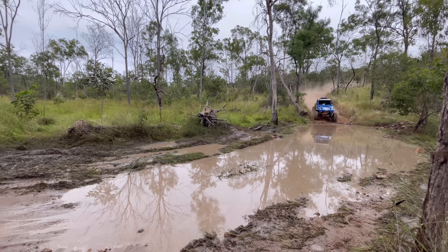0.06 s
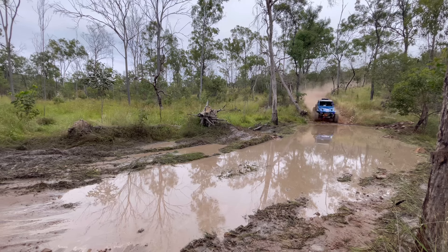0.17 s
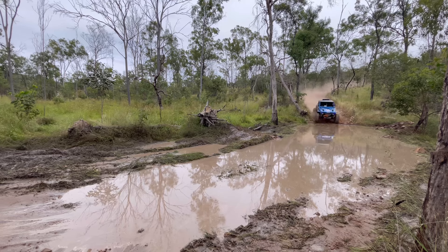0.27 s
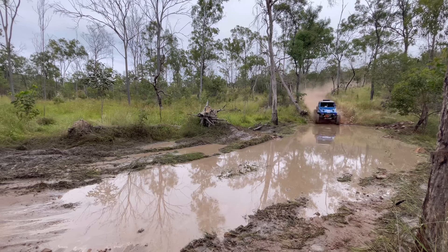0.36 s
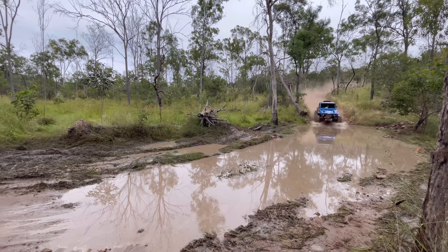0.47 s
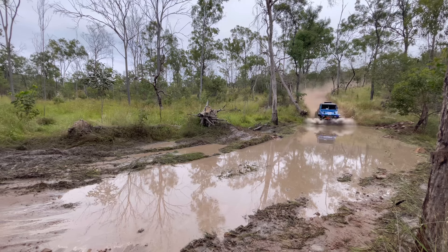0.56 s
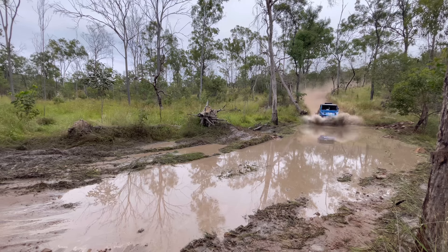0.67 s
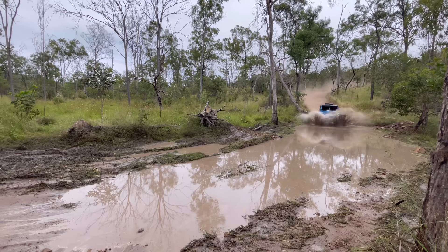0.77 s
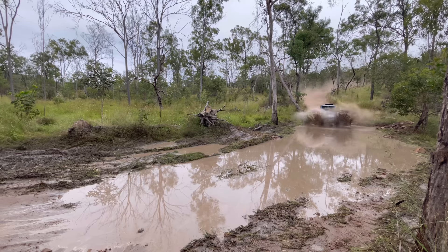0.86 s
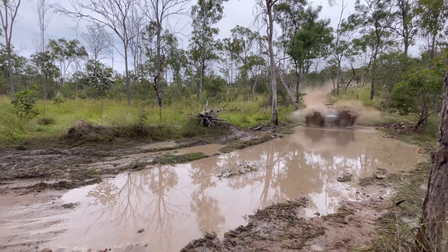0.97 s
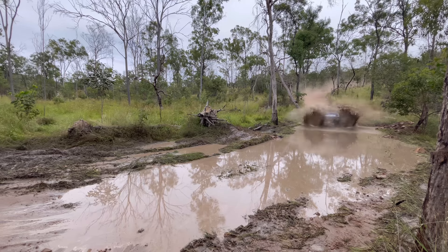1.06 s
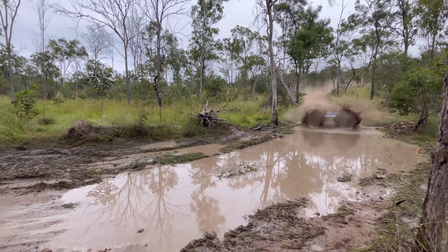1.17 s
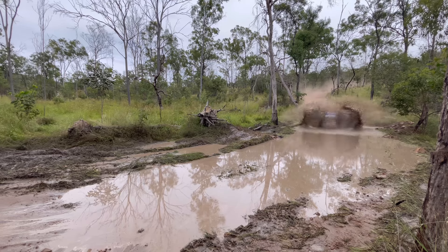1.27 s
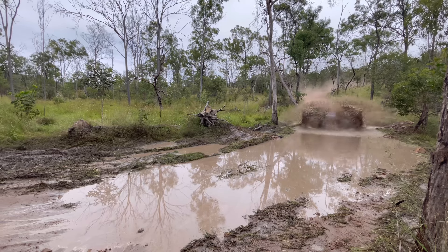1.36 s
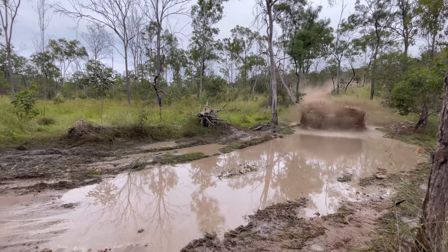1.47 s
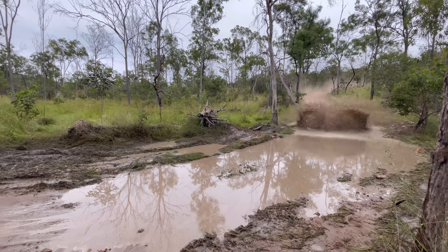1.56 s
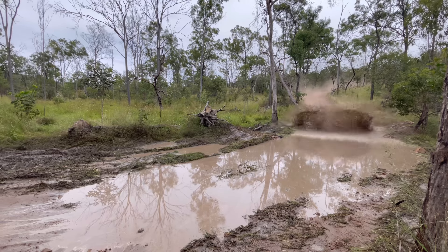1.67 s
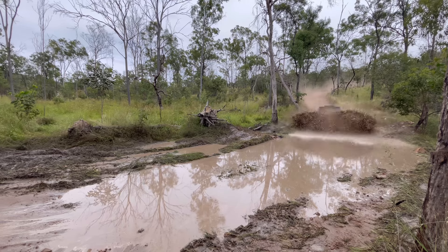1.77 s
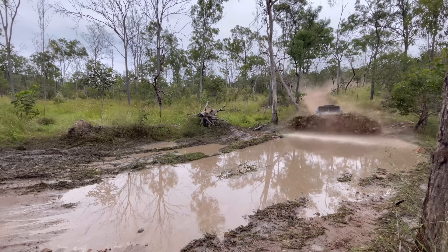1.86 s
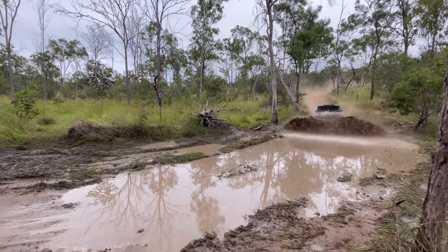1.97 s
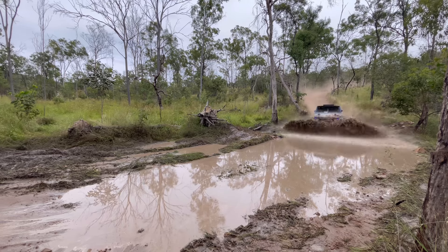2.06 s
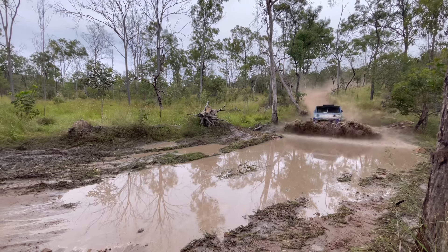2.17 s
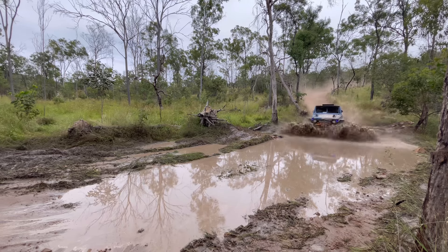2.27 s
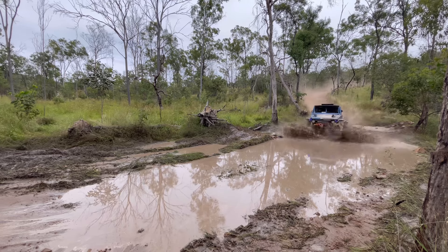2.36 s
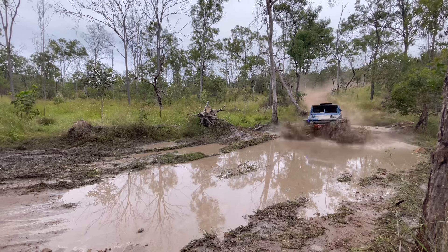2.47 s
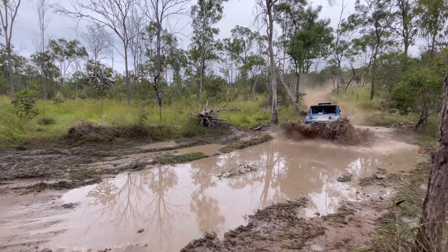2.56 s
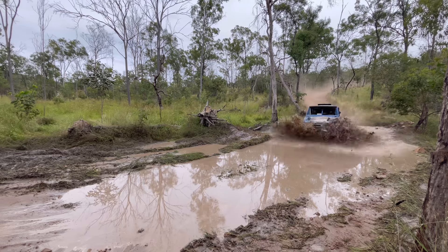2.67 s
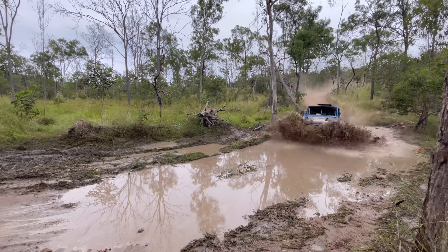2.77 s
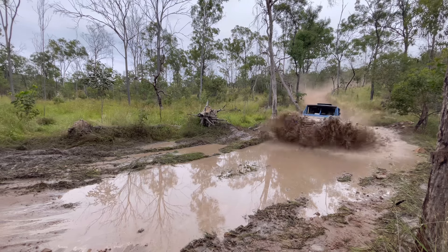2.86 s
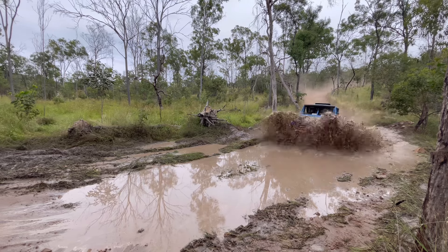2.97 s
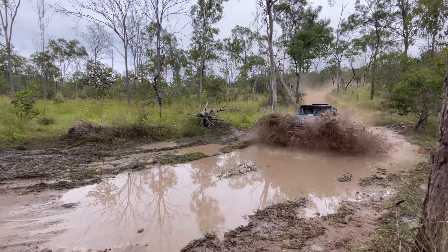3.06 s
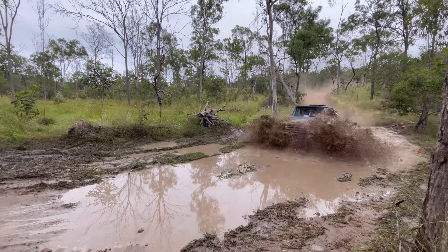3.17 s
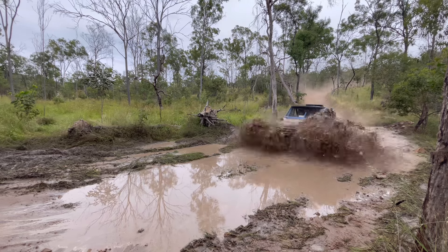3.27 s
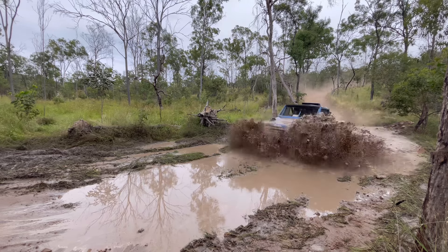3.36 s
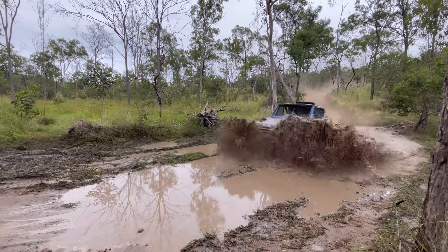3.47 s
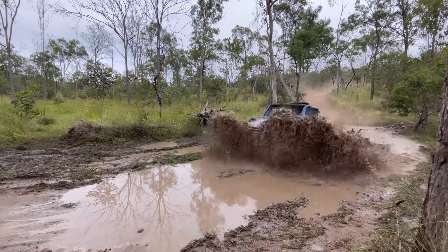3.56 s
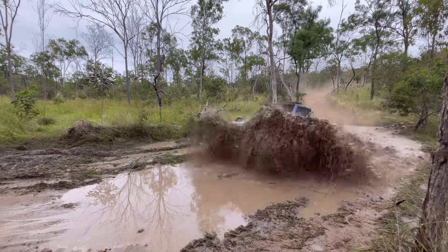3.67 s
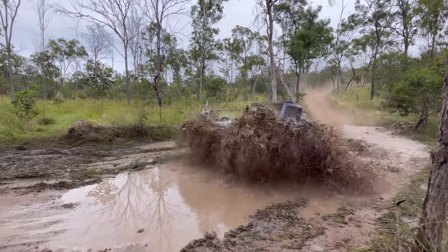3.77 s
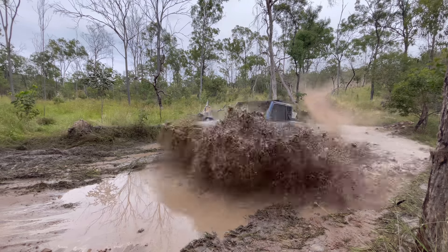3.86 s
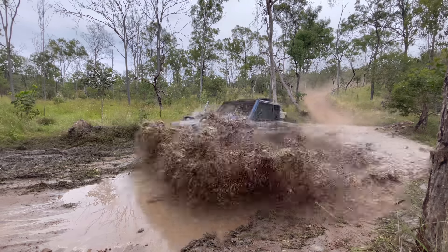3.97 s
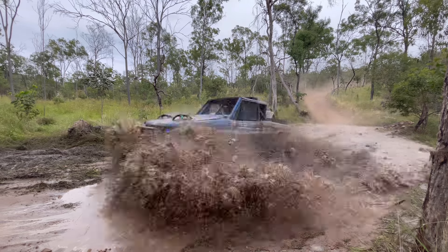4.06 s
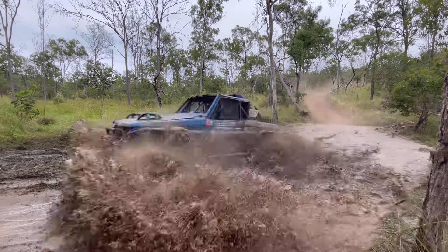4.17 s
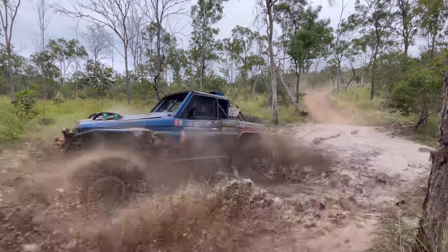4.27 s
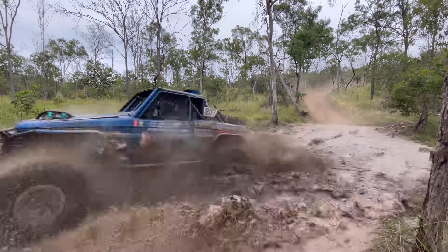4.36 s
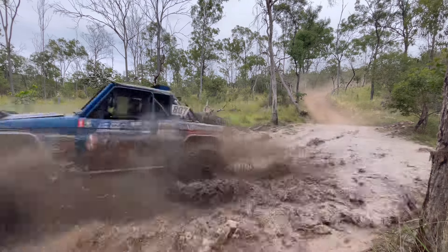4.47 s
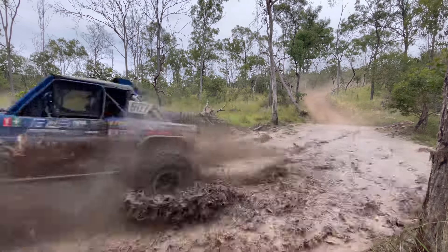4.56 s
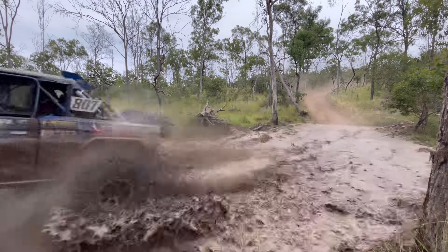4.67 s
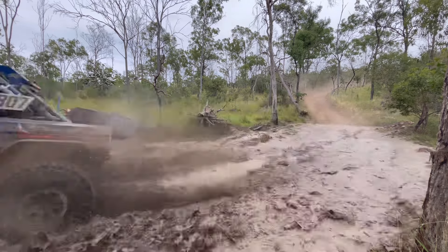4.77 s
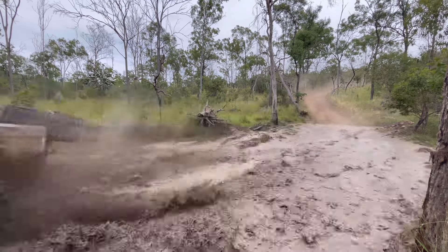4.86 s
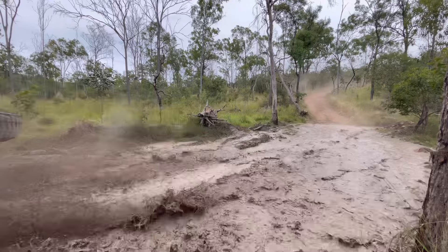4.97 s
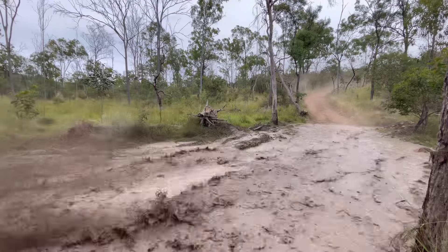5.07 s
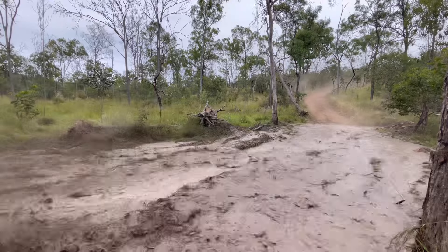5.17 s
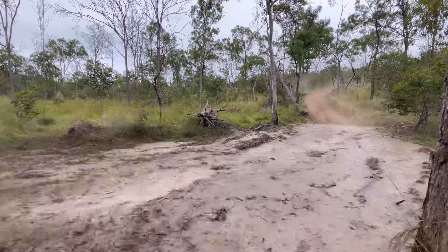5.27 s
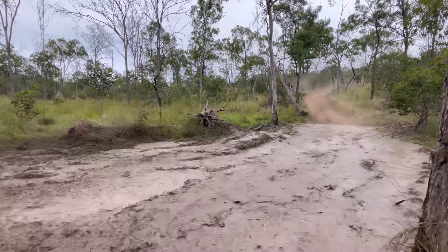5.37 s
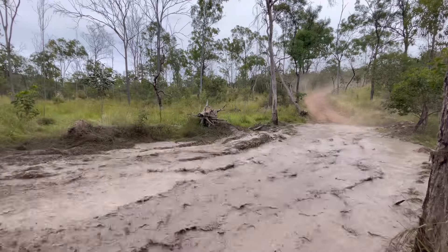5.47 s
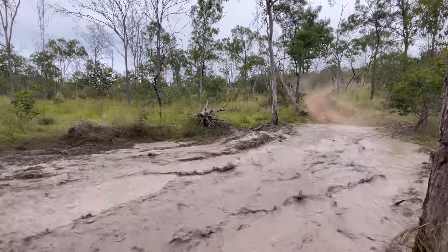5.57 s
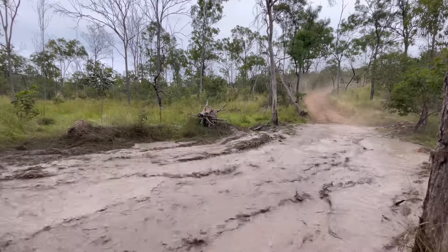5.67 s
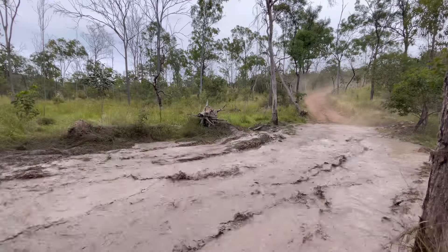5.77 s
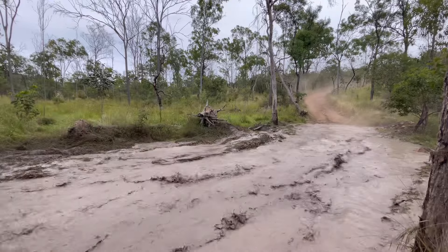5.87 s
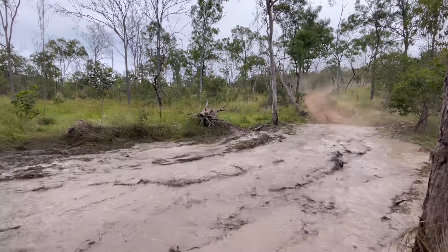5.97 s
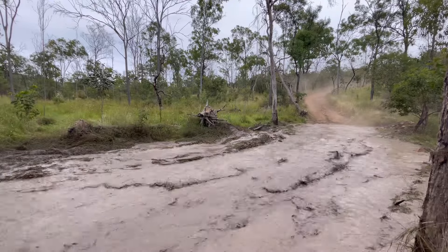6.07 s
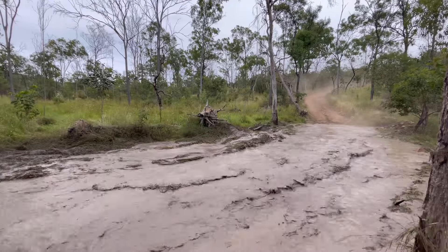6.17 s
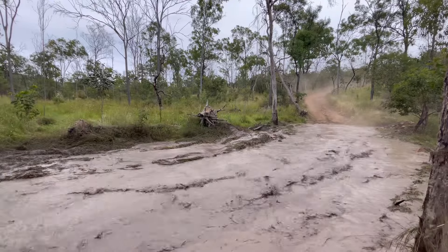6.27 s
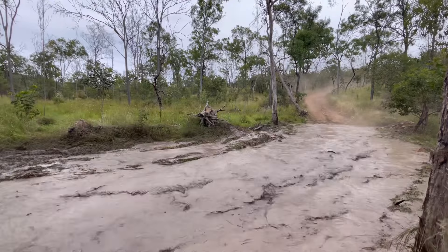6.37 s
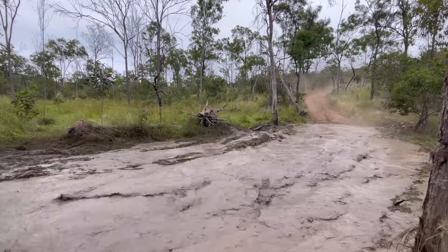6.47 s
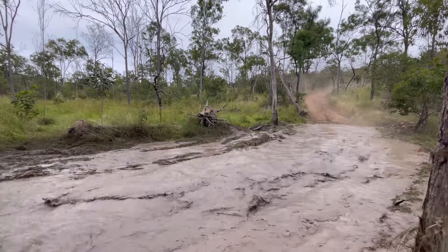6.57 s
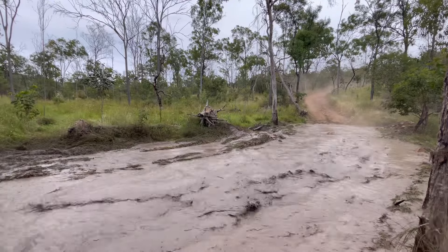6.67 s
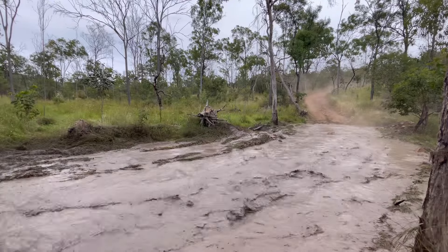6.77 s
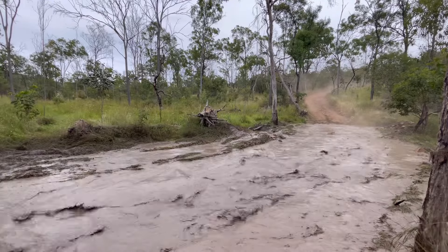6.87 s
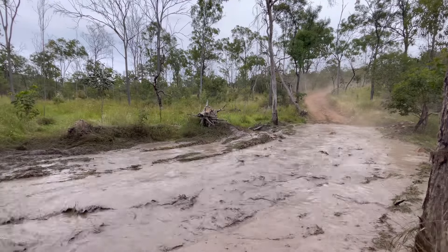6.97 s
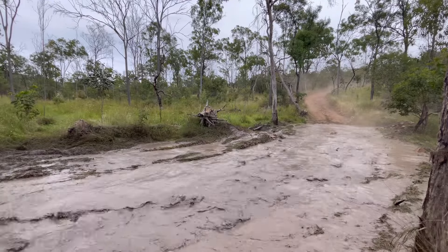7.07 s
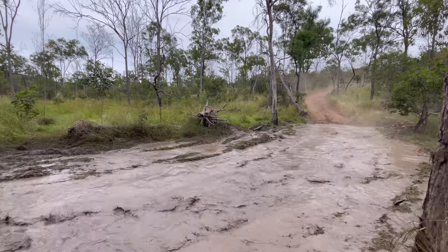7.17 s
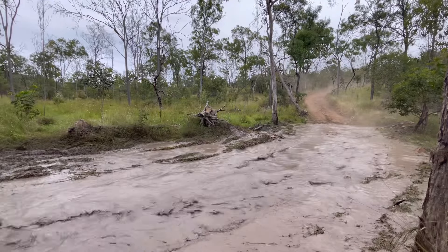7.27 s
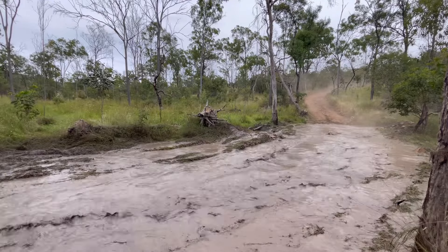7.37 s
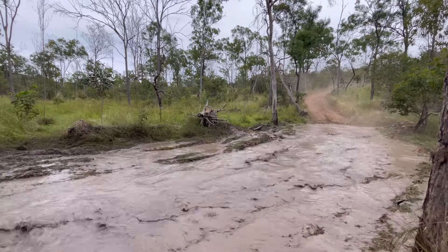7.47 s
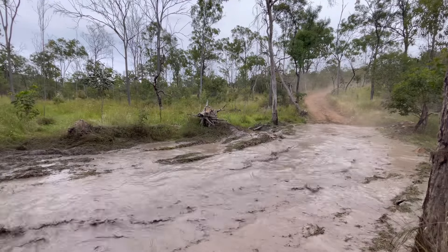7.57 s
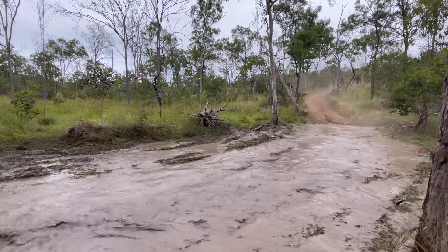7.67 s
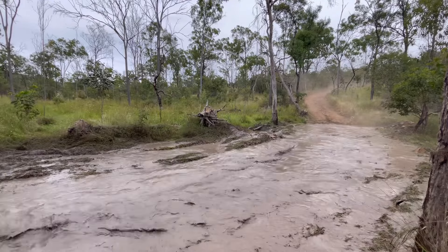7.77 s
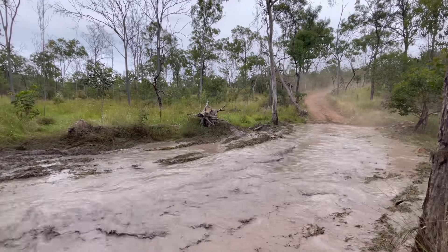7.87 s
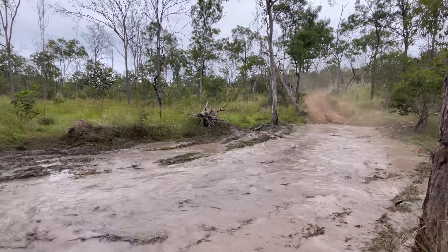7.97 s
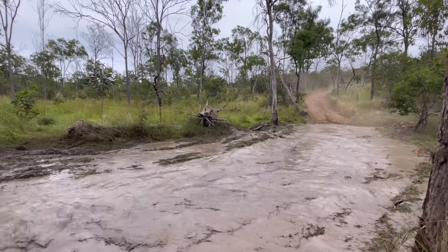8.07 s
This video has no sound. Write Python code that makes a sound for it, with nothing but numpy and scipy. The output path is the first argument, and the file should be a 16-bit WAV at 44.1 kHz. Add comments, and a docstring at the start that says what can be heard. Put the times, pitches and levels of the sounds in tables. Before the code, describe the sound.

Outdoors among trees, a phone microphone near a muddy puddle hears a V8 truck coming from the front. Its low hum wavers as the wheels slap into water, then revs up with gas roar and spray. Around four seconds it passes close with thick mud churn, rumble and tearing exhaust. Sharp cracks follow as it heads left, climbing in pitch, with a brief throttle lift and soft thud far off.

```python
"""A long muddy puddle with trees around: a cross-plane V8 off-road truck ploughs towards a phone,
passes close and roars off to the left. All eight firings hum one line, sine waves at multiples of the
engine cycle; each bank fires unevenly, which burbles on the odd multiples. Shaped noise makes the gas roar,
water spray, thrown mud and wheel rumble; pulses at the firings make pipe rasp and crackle.
Far off the chassis thuds over a bump and the throttle lifts."""
import sys
import numpy as np
from scipy import signal
from scipy.fft import rfft, irfft, next_fast_len
from scipy.io import wavfile
from scipy.ndimage import uniform_filter1d

SR = 44100
rng = np.random.default_rng(int(sys.argv[2]) if len(sys.argv) > 2 else 0)


def transcribe(u):
    """Save the signal u as a 16-bit wav file named by the first command-line argument.

    u: samples, shape (n,) or (channels, n), limited to [-1, 1]; the rate is SR.
    q: integer samples, one column per channel.
    """
    v = np.clip(np.atleast_2d(u).T, -1, 1)
    q = np.round(v * 32767).astype(np.int16)
    wavfile.write(sys.argv[1], SR, q)


N = 358091  # length in samples
T = np.arange(N) / SR  # time in s
SIZE = next_fast_len(N)
BINS = np.arange(SIZE // 2 + 1) * SR / SIZE  # filter frequencies in Hz
TOP_HZ = 15700  # nothing is kept above this

# "Order" k is a tone at k times the engine cycle; order 8 is the firing rate.
# Balance of the orders with both pipes heard alike: order, level/dB
END_ON_ORDERS = [(1, -43), (2, -26), (3, -20), (4, -18), (5, -14), (6, -9), (7, -28), (8, 0), (9, -29),
                 (10, -18), (11, -33), (12, -27), (13, -18), (14, -29), (15, -40), (16, -24), (17, -33),
                 (18, -36), (19, -36), (20, -31), (21, -44), (22, -30), (23, -40), (24, -38), (25, -34),
                 (26, -22), (27, -34), (28, -42), (29, -32), (30, -34), (31, -38), (32, -38), (33, -34),
                 (34, -36), (35, -40), (36, -40), (37, -40), (38, -38), (39, -38), (40, -40)]
# Balance of the orders with one bank nearer: order, level/dB
SIDE_ON_ORDERS = [(1, -28.5), (2, -19.5), (3, -11.5), (4, -37), (5, 1.5), (6, -1.5), (7, -5.5), (8, -1),
                  (9, -16), (10, -6), (11, -2.5), (12, -22), (13, -9), (14, -19), (15, -30), (16, -13.5),
                  (17, -22), (18, -20), (19, -24), (20, -28), (21, -40), (22, -24), (23, -26), (24, -24),
                  (25, -22), (26, -24), (27, -23), (28, -22), (29, -22), (30, -28), (31, -24), (32, -28),
                  (33, -28), (34, -24), (35, -32), (36, -32), (37, -30), (38, -30), (39, -30), (40, -30)]
# The bank that fires in each slot of the cycle: +1 or -1
FIRING_BANKS = np.array([1, -1, -1, 1, -1, 1, 1, -1])
# Engine speed and hum, coming, then going: t/s, cycle rate f/Hz, firing order level/dB
ENGINE_SPEED = [
    [(0.045, 12.9, -15), (0.17, 11.4, -16), (0.26, 12.7, -13), (0.33, 14.6, -10), (0.45, 15.8, -10),
     (0.6, 14.2, -13), (0.74, 15.0, -9), (1, 13.9, -12), (1.17, 14.8, -10), (1.4, 14.1, -8),
     (1.62, 15.2, -7), (1.85, 16.1, -7), (2.0, 17.8, -8), (2.14, 19.0, -8), (2.4, 19.2, -8),
     (2.58, 18.9, -6), (2.75, 19.5, -10), (2.96, 20.4, -10), (3.36, 19.8, -10)],
    [(3.46, 20.7, -10), (3.58, 21.3, -20), (3.81, 21.1, -10), (4.13, 21.4, -16), (4.24, 21.6, -12),
     (4.65, 22.1, -17), (4.76, 22.4, -24), (5.07, 22.7, -23), (5.24, 24.1, -27), (5.43, 23.7, -27),
     (5.6, 24.5, -24), (5.78, 25.1, -27), (5.92, 26.3, -21), (6.16, 25.9, -23), (6.37, 27.6, -22),
     (6.52, 27.2, -25), (6.68, 28.5, -26), (6.9, 28.1, -30), (7.05, 24.8, -37), (7.27, 28.5, -25),
     (7.45, 29.1, -24), (7.62, 30.0, -23), (7.88, 30.1, -23), (8.0, 30.5, -23), (8.12, 30.5, -24)],
]
# Before throttle lifts: t/s, odd orders level/dB, even low orders level/dB, upper orders level/dB,
# wheel rumble level/dB
ORDER_AND_RUMBLE_LEVELS = [(.15, -44, -31, -33, -41), (.8, -45, -26, -32, -36), (1.3, -45, -26, -34, -36),
                           (2.0, -40, -33, -35, -36), (2.5, -30, -23.5, -33, -29),
                           (3.0, -23, -23.5, -35, -26), (3.6, -16, -23.5, -35, -25.5),
                           (4.2, -15, -23.5, -33, -25), (4.8, -16, -25, -35, -26),
                           (5.2, -21, -27, -37, -34), (5.6, -25, -29, -44, -42), (6.1, -31, -30, -48, -55),
                           (6.7, -35, -31, -49, -57), (7.4, -38, -32.5, -50, -57),
                           (8.12, -38, -32.5, -49, -58)]
# How the truck is seen: t/s, side-on share 0-1, tilt of orders above 11 /dB per octave away from order 16
VIEW = [(.3, 0.67, -7.5), (1.7, 0.12, -25), (2.2, 0.15, -12), (3.0, 0.6, -6), (4.5, 0.88, 4),
        (5.4, 0.94, -9), (6.0, 0.5, 7), (6.9, 0.75, 9), (7.5, 0.13, 4), (8.12, 0.12, 1)]
# One cylinder fires weakly in the water: t/s, strength of its dip 0-1
WEAK_FIRING = [(0, .5), (.25, .6), (.35, .15), (.6, .4), (.95, .55), (1.3, .55), (1.5, .15), (1.95, .3),
               (2.2, .05), (2.7, .1), (2.9, .3), (3.6, .3), (4.0, 0), (8.12, 0)]
# Whine before throttle lifts: t/s, level/dB
WHINE_LEVEL = [(.1, -37), (1.5, -54), (1.8, -33), (2.2, -31), (2.6, -36), (3.2, -39.5), (5.0, -33),
               (5.6, -30), (6.0, -32), (6.4, -48), (7.2, -48), (7.6, -31), (8.12, -26.5)]
WHINE_ORDER = 21

# Spectra of noises and pulses; their loudness is set elsewhere, only the shape counts: f/Hz, gain/dB
SCATTER_COLOUR = [(30, -25), (60, -2), (95, 8), (150, 32), (200, 23), (240, 30.5), (290, 18.5), (400, 18),
                  (700, -10), (1500, -25), (4000, -60)]
RUMBLE_COLOUR = [(15, -35), (32, -25), (42, 19.5), (70, 16.5), (110, 20), (200, -28)]
GAS_COLOUR = [(250, -30), (500, 7), (700, 8.5), (1100, 7.5), (1500, 1.5), (1900, -1.5), (2400, -6),
              (3000, -10.5), (5000, -27.5), (8500, -18.5), (12000, -63), (15000, -64)]
SPRAY_COLOUR = [(400, -8.5), (1000, 4.5), (2500, 0.5), (4500, -2), (5500, -3.5), (6500, -1.5), (9000, -7.5),
                (10500, -11), (12200, 4.5), (13500, -3), (15500, -14)]
CHURN_COLOUR = [(300, -28), (480, -3), (620, 7.5), (760, 3.5), (950, -2), (1300, -20), (1800, -32)]
TEAR_COLOUR = [(500, -34), (800, -7), (950, 7), (1080, 1.5), (1300, 3), (1500, -19), (2200, -34)]
BRIGHT_COLOUR = [(1200, -30), (1600, -3.5), (2050, 1.5), (2500, -8), (3000, -28.5)]
CRACKLE_COLOUR = [(500, -20), (2000, 10), (2900, -4), (3600, 11), (4700, 8), (5600, -5), (6600, 0),
                  (9000, -13), (15000, -50)]

# Before slaps and throttle lifts: t/s, gas roar level/dB, spray level/dB
HISS_LEVELS = [(.08, -40, -50), (.25, -39.5, -55), (.42, -33.5, -48), (.65, -33, -43), (1.1, -36, -41),
               (1.6, -33, -38.5), (2.0, -33, -32), (2.42, -26.5, -32), (2.75, -31.5, -34.5),
               (3.5, -29.5, -29), (4.1, -21, -27), (4.5, -27, -27), (4.95, -25, -38), (5.45, -24.5, -44.5),
               (6.2, -30, -48.5), (6.8, -30.5, -45), (7.3, -33, -48.5), (7.6, -30.5, -39.5),
               (8.12, -35, -39.5)]
# The wheels slap into deeper water: t/s, jump of the roar /dB, jump of the spray /dB
WATER_SLAPS = [(.15, 5, 8.5), (0.489, 9, 15), (4.24, 5, 4.5)]
SLAP_RISE_S, SLAP_FADE_S = 0.046, 0.075
# Close by, rasp before throttle lifts: t/s, mud churn level/dB, tail pipe rasp level/dB
CLOSE_LEVELS = [(3.0, -41, -55), (3.5, -33, -53), (3.75, -29, -43), (3.95, -20, -29), (4.2, -22.5, -25),
                (4.38, -22, -17.5), (4.52, -21.5, -13), (4.7, -24, -16.5), (4.85, -18.5, -24.5),
                (5.12, -18.5, -31), (5.27, -32, -48), (5.6, -23.5, -55), (5.9, -28.5, -55), (6.4, -45, -58)]
# Swells of uneven firing, crackle and bright rasp: far level/dB, rise/dB per s, full from t/s,
# full level/dB, full until t/s, fade/dB per s, level left behind /dB
UNEVEN_SWELL = (-28, 3.5, 2.5, -19.5, 4, 8.5, -40)
CRACKLE_SWELL = (-74, 90, 5.14, -42, 5.6, 80, -60)
BRIGHT_RASP_SWELL = (-70, 45, 5.25, -36, 5.55, 30, -60)
# One cylinder cracks loudly about once a cycle, before a shared boost: t/s, level/dB
LOUD_CRACK_TIMES = [(5.1155, -25), (5.1601, -15), (5.21, -20), (5.2509, -20), (5.2938, -30), (5.3352, -22),
                    (5.3691, -17), (5.42, -22), (5.4539, -29), (5.4958, -24), (5.5462, -24), (5.5871, -23),
                    (5.6614, -30)]
# The chassis thuds, level before its soft start and decay: t/s, level/dB, f/Hz, time to fall 60 dB /s
BUMP_THUD = (6.96, -22, 62, .25)

# The throttle lifts, first early, then over the bump: fully shut at t/s, falls for /s, stays shut /s,
# returns in /s, depth 0-1 (at depth 0 the hiss and low orders stay, but the firing still turns ragged)
THROTTLE_LIFTS = [(.14, 0.3, .1, 0.065, 0), (7.06, 0.24, .03, 0.2, 0.46)]
# Changes at depth 1: roar, spray, whine, rasp and crackle; then the low orders
LIFT_DB, LIFT_LINES_DB = -34.5, -6
# Changes at any full lift: the upper orders drop; ragged firings sit this far from the hum
LIFT_UPPER_DB, RAGGED_DB = -16, -2.5
WAVER_DB = 1.7  # scale of the random level changes of the orders
LEFT_UPPER_RISE_DB = 7.5  # per octave above order 9: the upper orders grow once the truck is to the left

# The bearing swings from the front to the left of the phone
SWING_S, SWING_TAKES_S = 4.293, 0.27
# Distance eats the treble of roar and spray once the truck has gone: f/Hz, gain/dB
FAR_COLOUR = [(1000, -1.5), (4000, -2), (9000, -3), (11500, -16.5), (15000, -14)]
FAR_FROM_S, FAR_TAKES_S = 5.5, 1.3
# The wet mud mirrors the truck: longest lag when it is nearest
MIRROR_LAG_S, NEAREST_S, MIRROR_SHRINKS_S, MIRROR_DB = 0.002907, 4.4, 0.271, -13
# Unrelated return from the trees at each microphone opening: f/Hz, gain/dB
TREE_COLOUR = [(100, -34), (300, -2.5), (1000, -6), (2000, 0), (4000, 5.5), (8000, 3), (11000, 10),
               (15000, -30)]
# The phone body colours sound from the left: f/Hz, gain/dB
BODY_COLOUR = [(1000, 0.5), (2000, 3.5), (4000, -0.5), (8500, 0), (12000, 2), (15000, -37)]
# How far the left opening leads, from the front and from the left: f/Hz, phase/radians
FRONT_LEAD = [(0, 0), (600, -1.3), (1720, -1.8), (2500, -1.0), (5080, -3.2), (5680, -4.5), (5940, -2.8),
              (6980, -0.3), (7490, -0.3), (8270, 3.8), (9300, 3.1), (10900, 2.3), (12600, 0.1),
              (15200, -0.1)]
LEFT_LEAD = [(0, 0), (520, 2.4), (1290, 3.3), (3010, 8.6), (3790, 10.2), (4390, 12.4), (5510, 13.4),
             (5860, 15.3), (6980, 18.5), (8440, 15.5), (9390, 15.8), (10900, 15.1), (12500, 12.6),
             (15200, 12.6)]
# Balance from the front and from the left: f/Hz, left minus right level/dB
FRONT_BALANCE = [(100, 0), (500, -4), (2000, -9), (8000, -1)]
LEFT_BALANCE = [(100, -3.5), (500, 5), (2000, 6), (8000, 11)]


def undb(db):
    """Turn decibels into gain."""
    return 10 ** (np.asarray(db) / 20)


def unit(x):
    """Scale to rms 1, the same average strength for every sound."""
    return x / np.sqrt(np.mean(x ** 2))


def curves(table):
    """Draw every column of a timed table as a curve, one value a sample."""
    s, *columns = np.transpose(table)
    return [np.interp(T, s, c) for c in columns]


def gains(table):
    """Turn a colour table into filter gains, straight on a log-frequency axis."""
    f, db = np.transpose(table)
    return undb(np.interp(np.log(BINS + 1), np.log(f + 1), db))


def shape(x, gain):
    """Filter a sound by a gain at each frequency."""
    return irfft(rfft(x, SIZE) * gain, SIZE)[..., :N]


def walk(rate, count=1):
    """Wander at random: levels held 1 / rate s, smoothed twice; one value every count samples."""
    k = int(SR / rate / count)
    held = np.repeat(rng.standard_normal(int(N / SR * 40)), k)[:len(range(0, N, count))]
    return 1.35 * uniform_filter1d(uniform_filter1d(held, k), k)


def peak(s, rise_s, hold_s, fall_s):
    """Go from 0 straight up to 1 at the moment s, hold, then go straight down."""
    rising = 1 + (T - s) / rise_s
    falling = 1 - (T - s - hold_s) / fall_s
    return np.clip(np.minimum(rising, falling), 0, 1)


def swell(far_db, rise_db_s, from_s, full_db, until_s, fade_db_s, settle_db):
    """Level in dB that rises from afar, holds, and fades to what is left behind."""
    coming = np.maximum(full_db - rise_db_s * np.clip(from_s - T, 0, None), far_db)
    going = np.maximum(full_db - fade_db_s * np.clip(T - until_s, 0, None), settle_db)
    return np.where(T < from_s, coming, going)


def firings(turns, size):
    """Place a pulse of the given size at each of the eight firings in a cycle."""
    pulses = np.zeros(N)
    fired = np.flatnonzero(np.diff(np.floor(8 * turns)))
    pulses[fired] = size[:len(fired)]
    return pulses


def orders(hz, firing_db, burble_db, mismatch_db, upper_db, side_on, tilt_db, rise_db, waver_db, wobble, lope):
    """Engine hum: a sine on each order of the cycle; also returns the cycle phase in turns."""
    turns, out = np.cumsum(hz) / SR, np.zeros(N)
    step = 32  # levels are worked out every 32 samples, then smoothed
    side_on = np.clip(side_on[::step], 0, 1)
    end_on_db, side_on_db = np.array(END_ON_ORDERS)[:, 1], np.array(SIDE_ON_ORDERS)[:, 1]
    pattern = np.outer(end_on_db, 1 - side_on) + np.outer(side_on_db, side_on)
    for k in range(1, 41):
        # each family of orders follows one lead order
        if k == 8:
            lead, db = 8, firing_db
        elif k > 11:
            lead, db = 16, upper_db
        elif k % 2:
            lead, db = 5, burble_db
        else:
            lead, db = 6, mismatch_db
        # reflections make the upper orders waver more than the low ones
        high = np.clip(np.log2(k / 8), 0, 1)
        waver = 0.15 if k == 8 else 0.88 + high
        db = db[::step] + pattern[k - 1] - pattern[lead - 1] + waver * waver_db * walk(6, count=step)
        # ahead of the truck little but order 16 is left of the upper orders
        db += tilt_db[::step] * abs(np.log2(k / 16)) * (k > 11)
        # once the truck is to the left, the orders above 9 grow stronger
        db += rise_db[::step] * np.clip(np.log2(k / 9), 0, 1.3)
        drift = (1 + 3 * side_on) * walk(9, count=step)  # strongest side-on
        gain, drift = (uniform_filter1d(np.repeat(v, step), step)[:N] for v in (undb(db), drift))
        if k == 8:
            # the weak cylinder dips the hum once a cycle; the rest is lifted a little
            dip = np.exp(3.0 * (np.cos(2 * np.pi * turns) - 1))
            gain = gain * (1 + .4 * lope) * (1 - lope * dip)
        # unequal pipe lengths spread the orders over the cycle instead of piling them on one pulse
        phase = k * turns + k * k / 16 + wobble * high * drift
        out += np.sqrt(2) * gain * np.sin(2 * np.pi * phase)
    return out, turns


def whine(turns, lift):
    """A sine at a fixed multiple of the engine cycle, its level wandering slightly."""
    level_db = curves(WHINE_LEVEL)[0] + LIFT_DB * lift + 1.2 * walk(7)
    return undb(level_db) * np.sqrt(2) * np.sin(2 * np.pi * WHINE_ORDER * turns)


def scatter(turns):
    """No two firings are equally strong: a pulse of random size at each, with some noise."""
    pulses = unit(firings(turns, rng.standard_normal(N // 100)))
    return unit(shape(pulses + .5 * rng.standard_normal(N), gains(SCATTER_COLOUR)))


def gas(turns, puff, steady, far_bank_db):
    """Exhaust hiss that puffs after each firing, louder from the nearer bank; three unrelated streams."""
    slot = len(FIRING_BANKS) * turns
    bank = FIRING_BANKS[slot.astype(int) % len(FIRING_BANKS)]
    near = np.where(bank > 0, 1, undb(far_bank_db))
    gate = steady + near * np.exp(-(slot % 1) / puff)  # puff is in firing intervals
    return unit(shape(gate * undb(1.3 * walk(14)) * rng.standard_normal((3, N)), gains(GAS_COLOUR)))


def spray(drops_per_s, spread_db, drops_db):
    """Water hissing in surges, with single drops of very unlike size; three unrelated streams."""
    hit = rng.random((3, N)) < drops_per_s / SR
    drops = hit * undb(spread_db * np.minimum(rng.exponential(size=(3, N)), 3.5))
    hiss = rng.standard_normal((3, N)) + undb(drops_db) * unit(drops)
    surges = undb(0.92 * walk(19) + 0.14 * walk(30))
    return unit(shape(surges * hiss, gains(SPRAY_COLOUR)))


def wheel_rumble():
    """Rolling wheels: steady low noise."""
    return unit(shape(rng.standard_normal(N), gains(RUMBLE_COLOUR)))


def splashes():
    """Each slap into water lifts roar and spray fast and lets them die away, in dB."""
    jumps = 0
    for s, *db in WATER_SLAPS:
        fading = np.exp(-np.abs(T - s) / SLAP_FADE_S)
        jumps = jumps + np.outer(db, np.where(T < s, peak(s, SLAP_RISE_S, 0, 1), fading))
    return jumps


def churn(lumps_db):
    """Wheels throwing thick mud: a heavy mid roar in quick lumps."""
    return unit(shape(undb(lumps_db * walk(25.02)) * rng.standard_normal(N), gains(CHURN_COLOUR)))


def rasp(turns, colour, cylinder_db, scatter_db, air):
    """Tail pipes tear as they point at the phone: each cylinder has its own bite, varying every time."""
    chance = rng.standard_normal(N // 100)
    bite = np.resize(rng.standard_normal(len(FIRING_BANKS)), len(chance))
    bank = FIRING_BANKS[np.arange(len(chance)) % len(FIRING_BANKS)]  # the banks push opposite ways
    size = bank * undb(cylinder_db * bite + scatter_db * chance)
    return unit(shape(unit(firings(turns, size)) + air * rng.standard_normal(N), gains(colour)))


def crackle(turns, spread_db, one_cylinder_db, t60_s):
    """Some pressure fronts steepen into cracks: noise bursts of unlike size, one cylinder set apart."""
    chance = np.minimum(rng.exponential(size=N // 100), 3)
    one_cylinder = np.arange(len(chance)) % len(FIRING_BANKS) == 0
    size = undb(spread_db * chance + one_cylinder_db * one_cylinder)
    tail = np.exp(-np.log(1000) * np.arange(600) / SR / t60_s)
    bursts = signal.fftconvolve(firings(turns, size), tail)[:N]
    return unit(shape(bursts * rng.standard_normal(N), gains(CRACKLE_COLOUR)))


def loud_cracks(db, t60_s):
    """Loud tail pipe cracks: a short burst of fading noise at each listed moment."""
    s, level_db = np.transpose(LOUD_CRACK_TIMES)
    pulses = np.zeros(N)
    pulses[(s * SR).astype(int)] = undb(level_db + db)
    tail = np.exp(-np.log(1000) * np.arange(2000) / SR / t60_s)
    colour = gains(CRACKLE_COLOUR)
    bursts = signal.fftconvolve(pulses, tail)[:N]
    return shape(bursts * rng.standard_normal(N), colour / colour.max())


def thud(s, db, hz, t60_s):
    """The chassis over a bump: one low damped swing with a soft start."""
    t = np.clip(T - s, 0, None)
    start, decay = 1 - np.exp(-t / 0.018), np.exp(-np.log(1000) * t / t60_s)
    return undb(db) * start * decay * np.sin(2 * np.pi * hz * t)


def mirrored(x):
    """Add the copy off the wet ground; its lag shrinks with distance."""
    lag_s = MIRROR_LAG_S / np.hypot(1, (T - NEAREST_S) / MIRROR_SHRINKS_S)
    return x + undb(MIRROR_DB) * np.interp(T - lag_s, T, x)


def ports(x, lead, balance):
    """One sound at two microphone openings, each band with its own lead and balance."""
    half = np.sqrt(gains(balance)) * np.exp(1j * np.interp(BINS, *np.transpose(lead)) / 2)
    return shape(x, np.array([half, 1 / half]))


def scene():
    """The truck reaches both openings from its bearing; the trees return an unrelated share to each."""
    lift = sum(depth * peak(*times) for *times, depth in THROTTLE_LIFTS)
    lifted = sum(peak(*times) for *times, depth in THROTTLE_LIFTS)
    left = 1 / (1 + np.exp(-(T - SWING_S) / SWING_TAKES_S))
    far = np.clip((T - FAR_FROM_S) / FAR_TAKES_S, 0, 1)

    side_on, tilt_db = curves(VIEW)
    hz, firing_db = curves(np.concatenate(ENGINE_SPEED))
    burble_db, mismatch_db, upper_db, rumble_db = curves(ORDER_AND_RUMBLE_LEVELS)
    burble_db = burble_db + LIFT_LINES_DB * lift
    mismatch_db = mismatch_db + LIFT_LINES_DB * lift
    upper_db = upper_db + LIFT_UPPER_DB * lifted
    hum, turns = orders(hz, firing_db, burble_db, mismatch_db, upper_db, side_on, tilt_db,
                        LEFT_UPPER_RISE_DB * left, WAVER_DB, wobble=0.09, lope=curves(WEAK_FIRING)[0])
    # a lifted throttle fades from the usual unevenness to ragged firing
    uneven_gain = undb(swell(*UNEVEN_SWELL)) * (1 - lifted) + undb(firing_db + RAGGED_DB) * lifted
    uneven = uneven_gain * scatter(turns)

    gas_db, spray_db = curves(HISS_LEVELS) + splashes() + LIFT_DB * lift
    roar = undb(gas_db) * gas(turns, puff=1.0, steady=1.0, far_bank_db=-9.5)
    hiss = roar + undb(spray_db) * spray(drops_per_s=900, spread_db=2.0, drops_db=-10.5)
    hiss = (1 - far) * hiss + far * shape(hiss, gains(FAR_COLOUR))
    wheels = undb(rumble_db) * wheel_rumble() + thud(*BUMP_THUD)

    mud_db, rasp_db = curves(CLOSE_LEVELS)
    mud = undb(mud_db) * churn(lumps_db=1.6)
    tearing = undb(rasp_db + LIFT_DB * lift) * rasp(turns, TEAR_COLOUR, cylinder_db=3, scatter_db=5, air=1.5)
    # a brighter band as the pipes point back at the phone
    bright_gain = undb(swell(*BRIGHT_RASP_SWELL) + LIFT_DB * lift)
    tearing = tearing + bright_gain * rasp(turns, BRIGHT_COLOUR, cylinder_db=3, scatter_db=5, air=1.1)
    crackle_gain = undb(swell(*CRACKLE_SWELL) + LIFT_DB * lift)
    cracks = crackle_gain * crackle(turns, spread_db=6, one_cylinder_db=-6, t60_s=0.024)
    cracks = cracks + loud_cracks(db=3.5, t60_s=0.048)

    direct = hum + whine(turns, lift) + uneven + wheels + mirrored(hiss[0] + cracks + tearing + mud)
    echo = shape(hiss[1:], gains(TREE_COLOUR))
    from_front = ports(direct, FRONT_LEAD, FRONT_BALANCE) + echo
    from_left = shape(ports(direct, LEFT_LEAD, LEFT_BALANCE) + echo, gains(BODY_COLOUR))
    return (1 - left) * from_front + left * from_left


def record(dry):
    """The phone rounds the loudest peaks and cuts the top."""
    rounded = np.tanh(.8 * dry) / .75
    return signal.sosfilt(signal.ellip(12, .2, 80, TOP_HZ, fs=SR, output="sos"), rounded)


dry = scene()
out = record(dry)
transcribe(out)
```